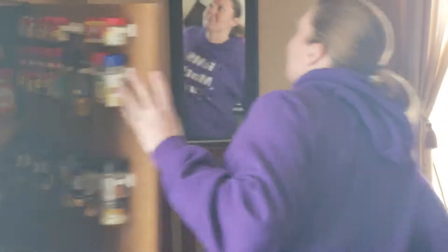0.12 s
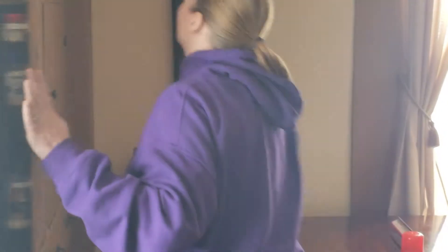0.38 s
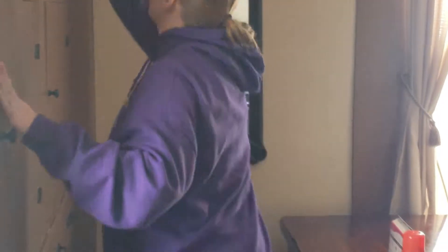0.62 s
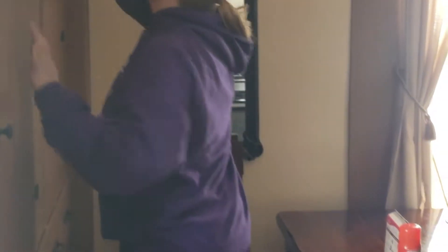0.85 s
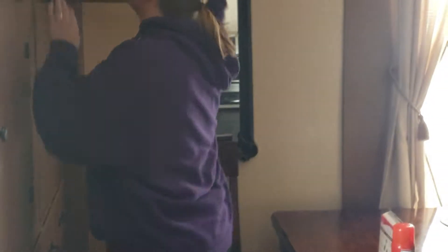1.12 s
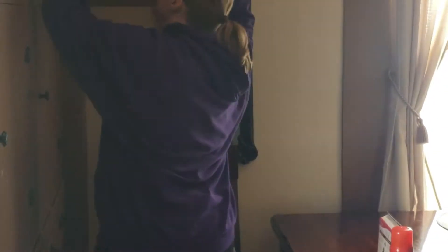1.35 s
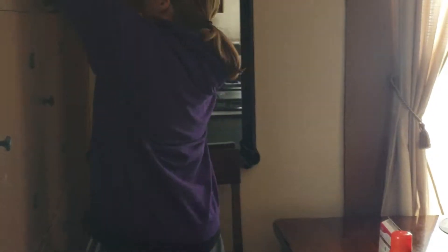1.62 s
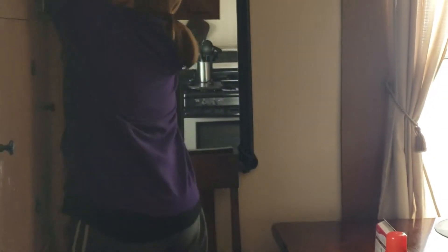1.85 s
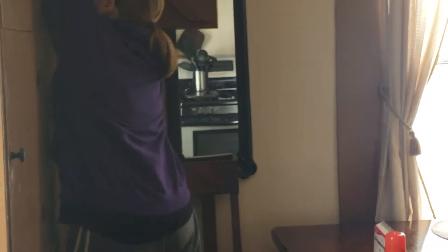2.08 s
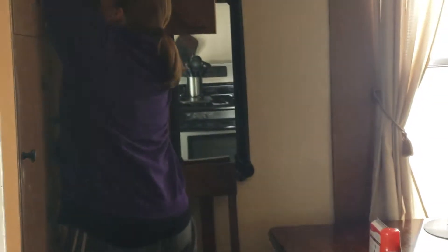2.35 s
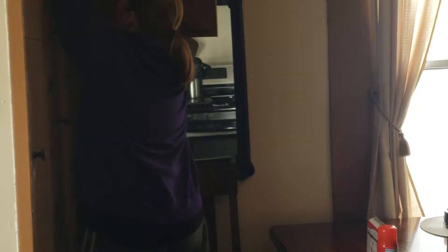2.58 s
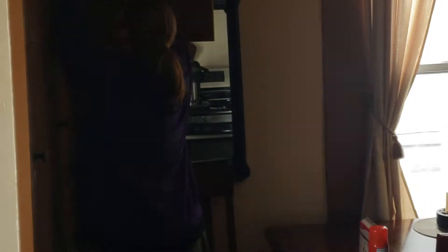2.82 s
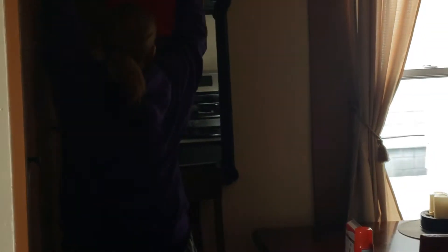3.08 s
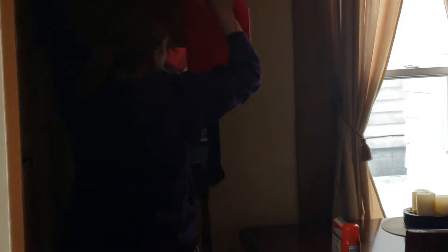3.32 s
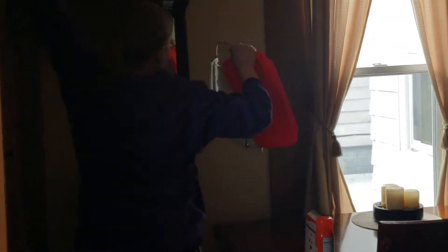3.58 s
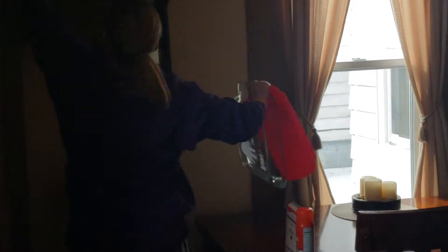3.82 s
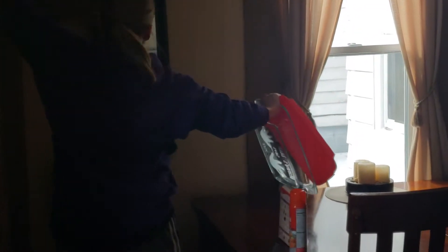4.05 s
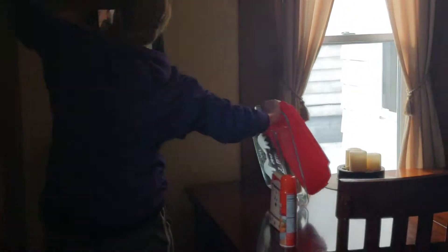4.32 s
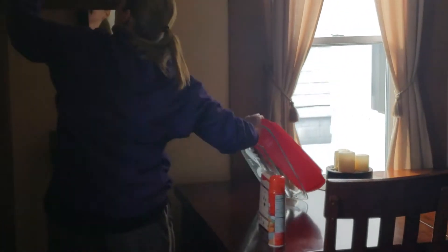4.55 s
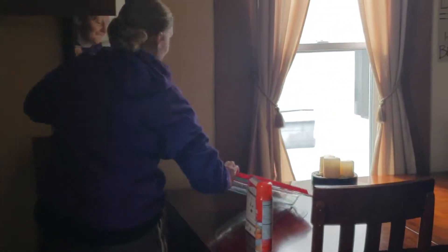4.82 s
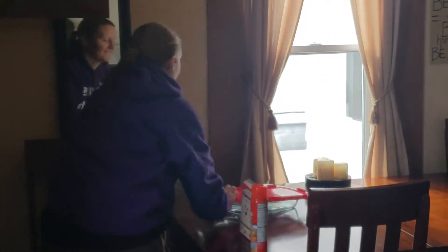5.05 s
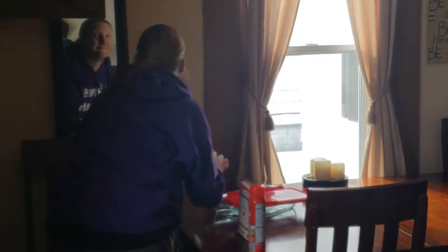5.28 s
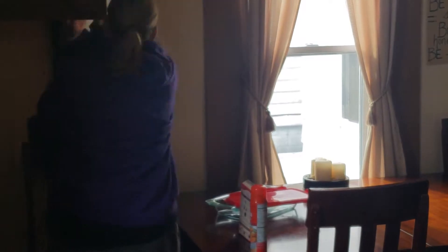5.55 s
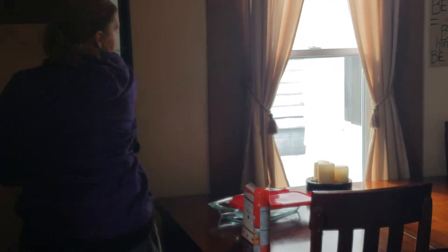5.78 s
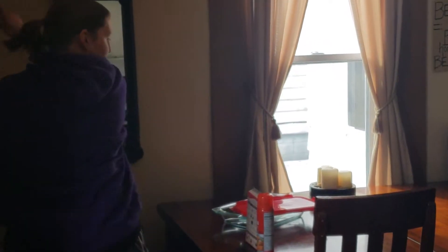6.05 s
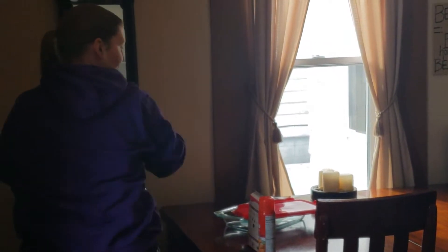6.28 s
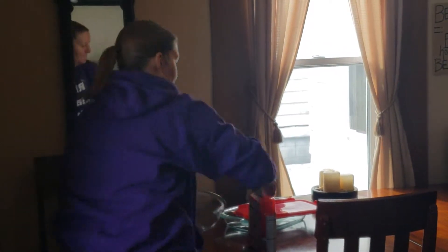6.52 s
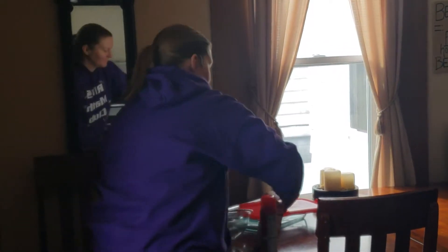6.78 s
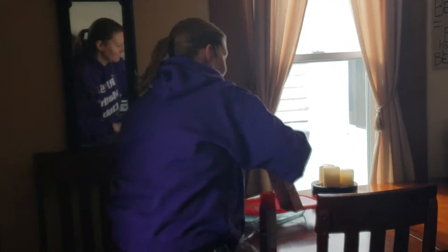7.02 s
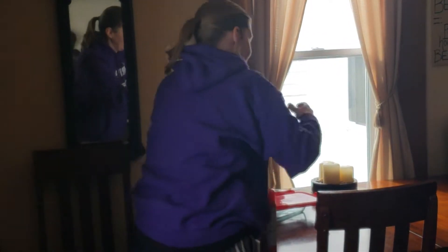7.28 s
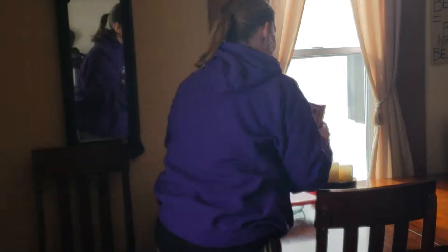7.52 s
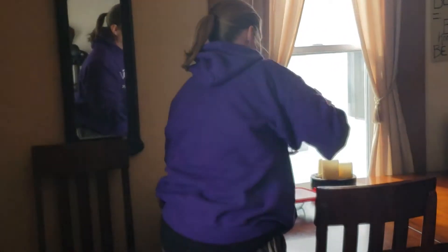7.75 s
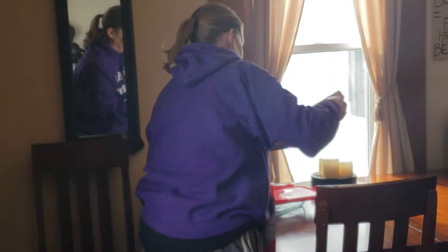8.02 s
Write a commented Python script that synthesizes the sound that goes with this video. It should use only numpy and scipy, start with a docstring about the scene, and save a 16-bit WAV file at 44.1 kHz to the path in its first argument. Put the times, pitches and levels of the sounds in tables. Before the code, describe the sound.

A small, hard-walled kitchen heard close through a handheld phone in stereo, with faint low rumble and sleeve rustle throughout. A knock opens at 0.0 seconds, a loud cupboard bang follows around 0.55, and lighter door knocks at 0.9. From 1.1 to 1.9 only a soft hissing sleeve rub grows. Between 2.0 and 2.9 a glass dish drags in jerks along a shelf, hissing, singing and clinking, with a brief rising squeak at 2.3 and a low bowl ring at 2.7, damped near 3.0. Bright glass clinks cluster at 3.4 to 3.6, fading by 3.8. Solid table knocks land at 4.0, 4.4, 4.7 and 5.2, the last strongest, then faint settling ticks. After a lull, boxes knock at 6.25, very hard at 6.84, and twice in quick succession at 7.2. From 7.3 a loose lid drops and rocks in dull, rapid, nearly even taps to the end as rustling grows.

```python
"""Cupboard doors, dishes and boxes knock in a small hard-walled kitchen, heard at the two ports of a phone.
Knocks are decaying noise with struck modes; glass, a deep bowl and a rocking lid are banks of damped modes.
A dish dragged along a shelf hisses, sings, clinks and squeaks by stick and slip.
Sleeves rustle as flickering noise throughout, and one hissing sleeve rub is noise through broad resonances.
Beneath lies a faint rumble with low thumps."""
import sys
import numpy as np
from scipy import signal
from scipy.fft import rfft, irfft, next_fast_len
from scipy.io import wavfile
from scipy.ndimage import map_coordinates

SR = 44100
rng = np.random.default_rng(int(sys.argv[2]) if len(sys.argv) > 2 else 0)


def gain_from_db(level_db):
    """Convert decibel levels to linear amplitude factors (20 dB per decade)."""
    decades = np.asarray(level_db, float) / 20
    return 10 ** decades


def int16_out(signal):
    """Quantize to a 16-bit WAV file."""
    q = np.round(np.clip(np.atleast_2d(signal).T, -1, 1) * 32767)
    wavfile.write(sys.argv[1], SR, q.astype(np.int16))


N = 358533
T = np.arange(N) / SR
STEP = 16  # samples between points of the slow level curves
SLOW = T[::STEP]
BANDS_HZ = 30 * 2 ** np.arange(0, 9.2, .5)  # centres of the half-octave bands

# Knocks of doors, dishes and boxes, and glass on glass. Each row: start in seconds, strength in dB,
# bass and treble relative to the middle in dB, pitch of the hollow note in hertz.
KNOCKS = [(0.0, -8.5, -25, -16.5, 1289), (0.271, -49.5, 2, 1.5, 300), (0.344, -35.5, -4, 1.5, 384),
          (0.519, -39, -12, -26, 247), (0.543, -16, 2, -7.5, 678), (0.568, -6.5, -11, -2, 666),
          (0.874, -22.5, -7, 5, 260), (0.898, -15, -4, -0.5, 330), (0.942, -25, 8, -26, 365),
          (1.079, -46.5, -59, 11.5, 350), (1.292, -45.5, -1, 12, 191), (1.904, -28, -14, 4.5, 1590),
          (2.644, -18, -42.5, -15, 1672), (2.718, -15, -13.5, -3, 1672), (2.839, -27, -6, -20, 700),
          (3.008, -30.5, -3, 9, 610), (3.043, -26, -26.5, -1, 668), (3.393, -22, 4.5, -16, 150),
          (3.409, -16, -8, 9.5, 1980), (3.479, -18, -48, 5.5, 1970), (3.601, -21, -49, 0.5, 1880),
          (3.77, -24, -57, -8.5, 2130), (3.991, -11, -14, -14.5, 212), (4.297, -32.5, 7.5, -12, 205),
          (4.385, -6, -2, -20, 575), (4.705, -3.5, -7.5, -17.5, 596), (4.767, -29.5, -8, -38, 665),
          (5.18, -2, -18, -20.5, 858), (5.259, -29, 0.5, -5, 393), (5.329, -34.5, -14.5, -1.5, 650),
          (5.411, -41.5, -20.5, -26, 860), (5.518, -42, -28.5, -28, 824), (5.59, -51, -23, -22.5, 804),
          (5.669, -43.5, 4.5, -19, 292), (5.739, -49, -17, 0, 1790), (5.819, -50, 5.5, -1, 391),
          (5.9, -48.5, -5, 0, 379), (6.223, -22.5, 1, -3, 183), (6.25, -7, -6, -10, 408),
          (6.547, -37, -24, -3, 812), (6.662, -39, -25, 1, 813), (6.832, -11, -5, -6, 402),
          (6.841, 0, -10.5, -21.5, 860), (7.049, -34, 1, -41, 270), (7.2, -6.5, -16, -10, 490),
          (7.207, -3, -18, -21.5, 730)]
# A glass dish dragged in jerks. Each row: time in seconds, relative level in dB, relative treble in dB.
DRAG = [(1.9, -57, 3), (1.912, -36, -6), (2.07, -40, -18), (2.09, -26, -8.5), (2.14, -20, -7.5),
        (2.188, -24, -3), (2.22, -16, -7), (2.26, -22.5, -11.5), (2.302, -17.5, -6), (2.318, -9.5, -1),
        (2.438, -11.5, -2.5), (2.506, -27.5, -8.5), (2.61, -37.5, -16.5), (2.678, -24, 2),
        (2.71, -33.5, -1.5), (2.73, -24.5, -0.5), (2.818, -35, -2.5), (3.0, -55.5, -11)]
# Spectrum of the drag. Each row: frequency in hertz, relative density in dB per hertz.
DRAG_COLOUR = [(24, -72), (40, -42.5), (112, -26.5), (455, -12), (585, -5.5), (873, -9.5), (1040, -10),
               (1210, -11), (1590, -8), (2980, -9.5), (16000, -33.5)]
# Stereo width of the sound field. Each row: frequency in hertz, side minus mid in dB.
SIDE_DB = [(60, -24), (110, -18.5), (200, -16), (380, -10.5), (700, -7), (1290, -1), (2380, -3), (4400, 0),
           (8120, -1.5), (15000, 0.5)]


def at_hz(table, hz):
    """Interpolation on a log-frequency axis: reads (hertz, value) points."""
    f, v = np.transpose(table)
    return np.interp(np.log(hz), np.log(f), v)


def along(table, outside=None, times=T):
    """Linear interpolation in time: the columns of a curve at the given times."""
    s, *columns = np.transpose(table)
    return [np.interp(times, s, c, outside, outside) for c in columns]


def band_db(colour, hz, treble_db, bass_db):
    """Band power is density times bandwidth; the ends of the colour are lifted or dropped as a whole."""
    shape = at_hz(colour, BANDS_HZ) + 10 * np.log10(BANDS_HZ)
    own = at_hz(colour, hz) + 10 * np.log10(hz)
    low = at_hz([(200, 0.98), (400, 0.038)], hz)
    high = at_hz([(2300, 0.074), (3700, 0.95)], hz)
    ranges = ((60, 300), (300, 3000), (3000, 12000))
    bass, middle, treble = [shape[(BANDS_HZ >= a) & (BANDS_HZ < b)].max() for a, b in ranges]
    return own - middle + low * (bass_db + middle - bass) + high * (treble_db + middle - treble)


def spread(hz):
    """Diffuse-field coherence: band noise alike at both ports in the bass, unrelated in the treble."""
    size = next_fast_len(N)
    f = np.arange(1, size // 2 + 2) * SR / size
    inside = np.abs(np.log2(f / hz)) < .5
    window = np.cos(np.pi * np.log2(f[inside] / hz))
    lines = np.zeros((2, len(f)), complex)
    lines[:, inside] = rng.standard_normal((2, inside.sum(), 2)) @ [1, 1j] * window
    mid, side = irfft(lines, size)[:, :N]
    side = side * gain_from_db(at_hz(SIDE_DB, hz))
    return np.array([mid + side, mid - side]) / np.std(mid)


def walk(rate, times=T):
    """Random modulation: normal values, rate of them a second, joined by straight lines; spread near 1."""
    knots = rng.standard_normal(4000)
    return 1.2 * map_coordinates(knots, [times * rate], order=1)


def ring(push, hz, t60):
    """A damped resonator is one complex pole; the phase lag between the ports widens with pitch."""
    pole = np.exp(2j * np.pi * hz / SR - np.log(1000) / (t60 * SR))
    z = signal.lfilter([1], [1, -pole], push)
    lag = np.arctan(gain_from_db(at_hz(SIDE_DB, hz))) * rng.choice([-1, 1])
    return np.array([(z * np.exp(1j * lag)).imag, (z * np.exp(-1j * lag)).imag]) / np.cos(lag)


def struck(modes, blows, chatter, scatter_db, longest_s, rough_db):
    """Modal excitation: each blow is a short chatter of contacts that wakes the modes unevenly."""
    out = np.zeros((2, N + SR))
    for s, db in blows:
        i = int(s * SR)
        for hz, mode_db, t60 in modes:
            t60 = min(t60, longest_s)
            t = T[:int(min(6 * chatter + t60, 1) * SR)]
            chance = rng.standard_normal((3, 200))
            decay = np.exp(-t[:SR // 8] / max(chatter, .0005))
            contact = rng.standard_normal(SR // 8)[:len(t)] * decay
            contact = np.pad(contact, (0, len(t) - len(contact)))
            # each blow detunes each mode slightly at random
            tone = ring(contact, hz * (1 + rough_db * .001 * chance[0, 0]), t60)
            gain_db = db + mode_db + scatter_db * chance[1, 0]
            # echoes make the ring flutter: 110 random levels a second
            flutter = np.interp(t * 110, np.arange(200), gain_from_db(gain_db + rough_db * chance[2]))
            out[:, i:i + len(t)] += flutter * tone / np.abs(tone.mean(axis=0)).max()
    return out[:, :N]


def rubbed(push, peaks):
    """Resonance under friction: rough contact keeps resonances sounding."""
    out = 0
    for hz, width_hz, db in peaks:
        t60 = np.log(1000) / (np.pi * width_hz)
        out = out + gain_from_db(db) * np.sqrt(width_hz / SR) * ring(push, hz, t60)
    return out


def job(s):
    """Contact mechanics: what is struck sets the rise, tail, hardness and note of a knock."""
    # Cupboard doors, dishes on the shelf, glass on glass, the stack meeting the table, the stack settling,
    # boxes on the table. Each row: end in seconds, rise in seconds, tail stretch as a ratio,
    # hardness in dB, hollow note in dB.
    jobs = [(1.5, 0.0054, 1.118, 3, -14), (3.2, 0.0069, 0.79, 5, -12.5), (3.9, .005, 0.94, -0.5, -14),
            (5.22, 0.0039, 1.12, 0, -10), (6.1, .006, 1.3, 0.5, -13), (9, 0.0024, 1.167, 0, -13)]
    return next(row[1:] for row in jobs if s < row[0])


def knock_power(hz):
    """Reverberant decay in one band: a direct crack, then a swell during contact that dies with the room."""
    # Spectrum of the knocks. Each row: frequency in hertz, relative density in dB per hertz.
    colour = [(24, -52), (40, -17), (109, 14), (189, 3.5), (382, -0.5), (503, -9.5), (585, -7), (852, -5),
              (1070, -12.5), (1900, -11.5), (3470, -26.5), (6820, -38), (16000, -46)]
    # Reverberation before the stretch of each job. Each row: frequency in hertz, t60 in seconds.
    room_t60 = [(60, 0.41), (250, 0.35), (1000, 0.27), (4000, 0.27), (16000, 0.16)]
    noise_db = -14
    power = np.zeros(len(SLOW) + SR // STEP)
    t = SLOW[:SR // STEP]
    crack = gain_from_db(2 * at_hz([(300, -3.0), (2000, 6.0), (12000, -1.5)], hz)) * np.exp(-t / .003)
    # hard contact lifts the upper mids
    edge = at_hz([(900, 0.048), (1500, 1.0), (2400, 0.65), (3600, 0.025)], hz)
    for s, db, bass_db, treble_db, _ in KNOCKS:
        rise, stretch, hard_db, _ = job(s)
        decay = np.exp(-2 * np.log(1000) * t / (stretch * at_hz(room_t60, hz)))
        swell = (1 - np.exp(-t / rise)) * decay
        level_db = db + noise_db + hard_db * edge + band_db(colour, hz, treble_db, bass_db)
        i = int(s * SR / STEP)
        # a slow rise softens the crack
        power[i:i + len(t)] += gain_from_db(2 * level_db) * (swell + crack * np.exp(-rise / 0.0043))
    return power[:len(SLOW)]


def knock_rings():
    """Free vibration: each knock is answered by a short hollow note, and some ring table or shelf wood."""
    # Table top, rung by the knocks after 3.9 s. Each row: mode in hertz, level in dB, t60 in seconds before a
    # 0.21 s ceiling.
    wood = [(120.4, -9, 0.11), (185, -18, 0.25), (257.7, -6.5, 0.29), (383.8, -8.5, 0.28), (624, -8, 0.32),
            (700, -5.5, 0.2), (840, -6, 0.32), (1165, -5.5, 0.046), (1294, -7, .09), (1673, -5.5, 0.076),
            (1900, -8.5, 0.11), (2230, -19, 0.033)]
    # A thin board. Each row: mode in hertz, level in dB, t60 in seconds.
    shelf = [(150, -9.5, 0.13), (205, -1.5, 0.15), (278.3, -6, 0.14)]
    # Blows on the board. Each row: start in seconds, strength in dB.
    shelf_blows = [(2.724, -23.5), (2.836, -20.5)]
    # Hollow things with one clear short note. Each row: start in seconds, pitch in hertz,
    # strength in dB, t60 in seconds.
    notes = [(0.005, 1267, -15.5, 0.16), (0.941, 342.5, -18, .2), (2.717, 1643, -11.5, 0.057),
             (5.52, 856, -49.5, 0.12), (6.254, 393.7, -12, 0.11), (6.665, 806, -54, .15),
             (7.31, 504, -30.5, 0.75), (4.706, 1680, -14.5, 0.044), (5.18, 1764, -10.5, .07)]
    wood_from_s = 3.9
    wood_blows = [(s, db - 12.0) for s, db, *_ in KNOCKS if s > wood_from_s]
    out = struck(wood, wood_blows, 0.016, 3, 0.21, 2.0)
    for s, db, _, _, hz in KNOCKS:
        # the hollow note stands out more in soft knocks
        note_db = job(s)[-1] - 0.1915 * db
        out = out + struck([(hz, note_db, .09)], [(s, db)], 0.022, 0, 0.13, 1.4)
    for s, hz, db, t60 in notes:
        out = out + struck([(hz, 0, t60)], [(s, db)], 0.02, 0, 1, 1.5)
    return out + struck(shelf, shelf_blows, 0.027, 0.9, .2, 1.6)


def rumble():
    """Structure-borne sound: faint steady low noise, and thumps that swell and sink."""
    # Thumps through floor boards and the hand that holds the phone.
    # Each row: start in seconds, strength in dB.
    thumps = [(0.0, -48), (0.4, -70), (0.56, -28.5), (0.9, -46), (1.3, -62), (4.38, -56), (5.18, -48),
              (5.78, -55), (6.22, -45), (6.82, -47), (7.2, -64)]
    rise_s, fall_s = .04, 0.11
    level = gain_from_db(-67)
    for s, db in thumps:
        t = np.maximum(T - s, 0)
        level = level + gain_from_db(db) * (1 - np.exp(-t / rise_s)) * np.exp(-t / fall_s)
    return sum(spread(hz) for hz in BANDS_HZ[1:4]) * level


def rustle_power(hz, swell, crinkle):
    """Friction noise of sleeves and hands, with the quiet of the room, as power in one band."""
    # Course of the rustle. Each row: time in seconds, relative level, treble and bass in dB.
    course = [(0.0, -55.5, 3, 1), (0.41, -56, -10, -5), (0.61, -41.5, -8, -1.5), (1.06, -53, -9.5, 5),
              (1.31, -56, -4, 7), (1.77, -50.5, -4, -2), (1.97, -45, -2.5, 1), (2.33, -35, -15.5, -17.5),
              (2.9, -37, -16, 9.5), (3.14, -59, -2, -4), (3.44, -55.5, -12, 4.5),
              (3.65, -42.5, -12.5, -1.5), (3.8, -58, -2.5, -5), (4.17, -48.5, -10.5, -18),
              (4.35, -68.5, 1.5, 12), (4.64, -38.5, -19.5, 6), (4.94, -58.5, -7.5, 15.5),
              (5.2, -59, -3.5, 6.5), (6.11, -66.5, 3.5, 5.5), (6.75, -56, -7.5, 1), (7.38, -46, -8.5, 8.5),
              (7.72, -44.5, -8.5, -4.5), (8.13, -36, -8, 5)]
    # Spectrum of the rustle. Each row: frequency in hertz, relative density in dB per hertz.
    colour = [(15, -51), (25, -21), (141, -14), (249, -9.5), (326, -7.5), (373, -12), (463, -12),
              (503, -16.5), (695, -16), (818, -19), (1070, -16), (1190, -18), (3160, -20.5), (4370, -20),
              (16000, -27)]
    level_db, treble_db, bass_db = along(course, None, SLOW)
    # the treble comes in quick bursts
    bursts = crinkle * at_hz([(3000, 0.46), (9000, 0.85)], hz)
    flicker = 0.52 * walk(37, SLOW)
    return gain_from_db(2 * (level_db - 10.5 + swell + bursts + flicker + band_db(colour, hz, treble_db, bass_db)))


def sleeve_rub():
    """Friction noise through broad resonances: a soft, hissing sleeve rub that slowly grows."""
    # Resonances of the rub. Each row: frequency in hertz, width in hertz, level in dB.
    peaks = [(1630, 150, -5), (4530, 1000, -2), (7000, 900, -7.5), (9950, 1200, -9.5)]
    span_s, span_db = (1.1, 1.9), (-51, -44)
    start, end = (int(s * SR) for s in span_s)
    level_db = np.interp(T, span_s, span_db) + 1.5 * walk(12)
    grit = rng.standard_normal(N)[start:end] * gain_from_db(level_db)[start:end]
    return np.pad(rubbed(grit, peaks), ((0, 0), (start, N - end)))


def drag_power(hz, judder):
    """Friction noise of the dragged dish as power in one band, with judder common to all bands."""
    level_db, treble_db = along(DRAG, -120, SLOW)
    flicker = 1.5 * walk(40, SLOW)
    return gain_from_db(2 * (level_db - 12 + judder + flicker + band_db(DRAG_COLOUR, hz, treble_db, -14)))


def drag_song():
    """Stick and slip shake the dragged dish's resonances."""
    # Resonances of the dish. Each row: frequency in hertz, width in hertz, level in dB.
    peaks = [(1609, 28, 3.5), (2010, 21, -12), (2235, 20, -2.5), (2455, 42, -4.5), (2870, 73, -5),
             (3704, 110, -3), (5500, 58, -14.5), (4430, 38, -11)]
    start, end = int(DRAG[0][0] * SR), int(DRAG[-1][0] * SR) + SR // 4
    grit = rng.standard_normal(N) * gain_from_db(3.0 * walk(120) + along(DRAG, -120)[0] - 3.5)
    return np.pad(rubbed(grit[start:end], peaks), ((0, 0), (start, N - end)))


def drag_clatter(count):
    """Repeated small impacts: the dish skips and bumps its neighbours, each clink on its own pitch."""
    clink_db = -8
    out, t = np.zeros((2, N)), T[:SR // 14]
    level_db, treble_db = along(DRAG)
    first_s, last_s = DRAG[0][0], DRAG[-1][0]
    for when, pitch, size, lag, length in rng.random((count, 5)):
        i = int((first_s + when * (last_s - first_s)) * SR)
        hz = 800 * 11.0 ** pitch
        db = level_db[i] + clink_db + band_db(DRAG_COLOUR, hz, treble_db[i], 0) + 9 * size ** 2
        # the second port leads by up to half a cycle
        wave = np.sin(2 * np.pi * (hz * t + lag / 2 * np.array([[0], [1]])))
        envelope = (1 - np.exp(-t / 0.0036)) * np.exp(-t / (0.0043 + 0.018 * length))
        out[:, i:i + len(t)] += gain_from_db(db) * wave * envelope
    return out


def squeak():
    """Stick-slip oscillation: rubbed glass sings a gliding, wavering note with a partner about a tone above."""
    # Each row: start in seconds, length in seconds, first and last pitch in hertz, level in dB.
    squeaks = [(2.294, .17, 932, 1056, -19.5), (4.56, .12, 1670, 1700, -41)]
    attack_s, release_s, rough = .03, .012, .012
    out = 0
    for (s, length, first_hz, last_hz, db), partner_db in zip(squeaks, (-22, -8)):
        hz = np.interp(T, [s, s + length], [first_hz, last_hz])
        release = np.exp(-np.maximum(T - s - length, 0) / release_s)
        shape = np.clip((T - s) / attack_s, 0, 1) * release
        for ratio, line_db, lag in ((1, 0.018, 0.4), (1.13, partner_db, -0.68)):
            phase = 2 * np.pi * np.cumsum(ratio * hz * (1 + rough * walk(150))) / SR
            strength = gain_from_db(db + line_db + 3.5 * walk(70))
            out = out + shape * strength * np.sin(phase + np.array([[lag], [-lag]]))
    return out


def bowl():
    """Damping by contact: a deep bowl rings long and low until a touch or the next blow stills it."""
    # Each row: mode in hertz, level in dB, t60 in seconds.
    modes = [(695, 0, 1), (1025, -17, 1), (1680, -10, 0.16), (2316, -5.5, 0.32), (4050, -6.5, 0.11)]
    # Each row: start in seconds, strength in dB.
    blows = [(2.643, -29), (2.717, -27), (2.737, -17.5), (3.02, -40), (3.041, -36), (3.411, -31),
             (3.616, -37), (3.767, -42), (3.992, -39)]
    # A hand stills the bowl: times in seconds.
    touched_s = [3.015, 4.17]
    stops = touched_s + [b[0] for b in blows]
    out = 0
    for blow in blows:
        stop = min(s for s in stops if s > blow[0])
        damping = np.exp(-np.maximum(T - stop, 0) / 0.0061)
        out = out + struck(modes, [blow], 0.0017, 0.6, 1.4, 0.3) * damping
    return out


def glass():
    """Inharmonic modes of struck glass: a big dish, a small dish and a smaller glass clink."""
    # Modes of the three glasses. Each row: mode in hertz, level in dB, t60 in seconds.
    big_dish = [(1330, -14, .15), (1825, -14, .15), (1914, 3, .27), (2067, -12, .2), (2630, -15.5, .15),
                (2900, -20, .2), (3515, -9, .2), (3555, -10, .3), (4290, -18, .2), (4810, -28, .3),
                (5455, -12, .25), (6078, -8, .22), (6880, -19, .16), (7580, -15, .14), (7930, -24, .2),
                (8200, -26, .2), (9190, -27, .2), (10180, -25, .17), (10500, -23, .1), (11510, -27, .15),
                (12120, -28, .2), (12520, -20, .08), (14570, -26, .2)]
    small_dish = [(1298, -16, .2), (1495, -15, .2), (1950, 0, .25), (2030, -1, .22), (2590, -15, .15),
                  (2780, -18.5, .15), (3515, 0, .22), (3580, -4, .25), (4296, -3, .13), (4805, -17, .3),
                  (5460, -5, .18), (6110, -16, .25), (6912, -21, .25), (7197, -25, .25), (7596, -17, .2),
                  (7870, -20, .2), (9152, -23, .17), (9720, -21, .25), (11560, -22, .18), (12550, -16, .11),
                  (14320, -25, .2)]
    tumbler = [(2536, -3, .05), (3881, 0, .08), (4264, -1, .1), (6067, -8, .07)]
    # Blows on the three glasses. Each row: start in seconds, strength in dB.
    big_blows = [(3.411, -12.5), (3.4286, -17), (3.4535, -18.5), (3.4789, -15.5), (3.501, -21),
                 (3.522, -20)]
    small_blows = [(3.6024, -27.5), (3.615, -26), (3.6444, -28.5), (3.7689, -43.5), (3.7991, -43),
                   (3.8294, -56.5)]
    tumbler_blows = [(3.478, -16.5)]
    out = struck(big_dish, big_blows, 0.0037, 2.7, 1, 2.4)
    out = out + struck(small_dish, small_blows, 0.0098, 1.8, 0.49, 4.2)
    return out + struck(tumbler, tumbler_blows, 0.0082, 1.1, .2, 2.9)


def lid():
    """Rocking from rim to rim: a loose lid drops, then taps almost evenly, each tap waking dull modes."""
    # Each row: mode in hertz, level in dB, t60 in seconds.
    modes = [(191, -13, 0.14), (252.6, -2, 0.086), (371, -1.5, 0.22), (610, -7, 0.028), (834, -10.5, 0.085),
             (1167, -16, 0.1), (1584, -18, 0.039)]
    # Each row: start in seconds, strength in dB.
    drops = [(7.327, -30), (7.471, -31)]
    rocks_s, period_s = 7.556, .0692
    times = np.arange(rocks_s, N / SR, period_s)
    late, loud = rng.standard_normal((20, 2))[:len(times)].T
    taps = list(zip(times + 0.004 * late, -34 + .8 * loud))
    return struck(modes, drops + taps, .023, 1.5, 0.24, 1.8)


def diffuse():
    """Diffuse field: powers of unrelated noises add, each band with its own colour and flicker."""
    judder, swell, crinkle = 1.1 * walk(60, SLOW), 1.0 * walk(9, SLOW), 3 * walk(36, SLOW)
    out = rumble()
    for hz in BANDS_HZ[2:]:
        power = knock_power(hz) + drag_power(hz, judder) + rustle_power(hz, swell, crinkle)
        out = out + spread(hz) * np.interp(T, SLOW, np.sqrt(power))
    return out


def standing_waves(sound):
    """Room modes: walls favour some pitches over their neighbours, differently at each port in the treble."""
    size = 2 * next_fast_len(N // 2 + SR // 4)
    f = np.arange(1, size // 2 + 2) * SR / size
    # one random value every 45 Hz
    common, apart = (np.interp(f / 45, np.arange(600), k) for k in rng.standard_normal((2, 600)))
    apart = apart * at_hz([(400, 0), (2000, 0.88)], f) * np.array([[1], [-1]])
    depth_db = 3.5 * at_hz([(3000, 0.79), (14000, 0.23)], f)
    ripple_db = depth_db * (common + apart) - 1
    # folding the cepstrum puts all the ringing after the blow, none before it
    cepstrum = irfft(np.log(gain_from_db(ripple_db)), size)
    cepstrum[:, 1:size // 2] *= 2
    cepstrum[:, size // 2 + 1:] = 0
    return irfft(rfft(sound, size) * np.exp(rfft(cepstrum)), size)[:, :N]


def scene():
    """Superposition: all sources add at the two ports."""
    drag = drag_song() + drag_clatter(count=900)
    objects = knock_rings() + sleeve_rub() + drag + squeak() + bowl() + glass() + lid()
    return standing_waves(diffuse()) + objects


def top_cut(x):
    """Nothing passes above the cut-off."""
    return signal.sosfilt(signal.butter(12, 16670, fs=SR, output="sos"), x)


def record(dry):
    """Linear filtering, then saturation: the microphone colours the sound and the loudest peaks flatten."""
    # Microphone response. Each row: frequency in hertz, gain in dB.
    microphone = [(20, -15), (50, -2), (2400, 0), (3200, -2.5), (4500, 1), (6500, 0.5), (8000, -1),
                  (10000, -4.5), (13000, 1), (16500, -2.5)]
    size = next_fast_len(N)
    colour = gain_from_db(at_hz(microphone, np.arange(1, size // 2 + 2) * SR / size))
    heard = irfft(rfft(dry, size) * colour, size)[:, :N]
    flattened = 1.372 * np.tanh(heard / 1.429)
    return top_cut(flattened)


dry = scene()
out = record(dry)
int16_out(out)
```